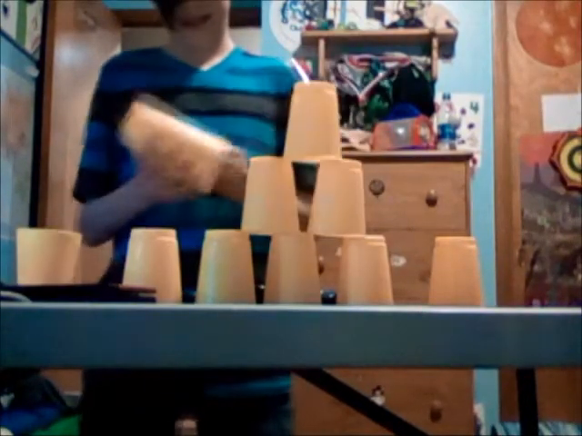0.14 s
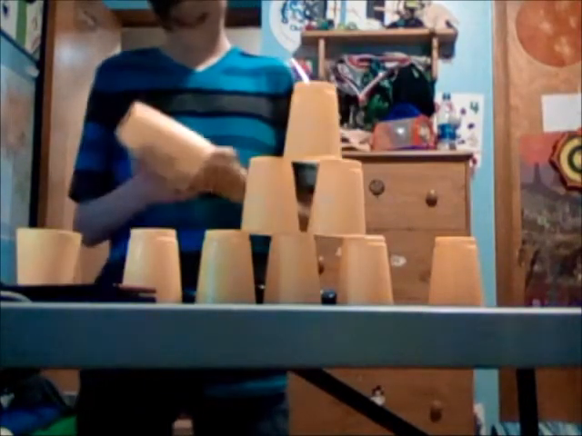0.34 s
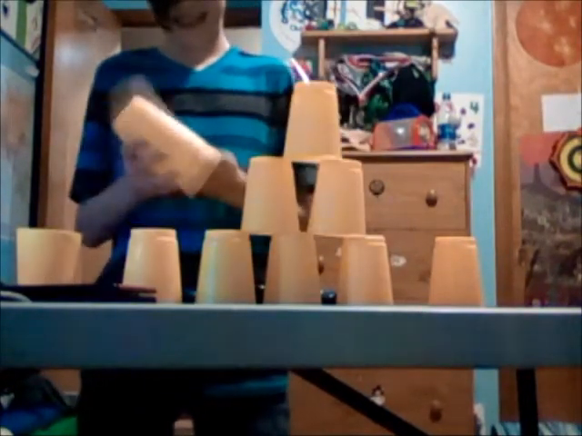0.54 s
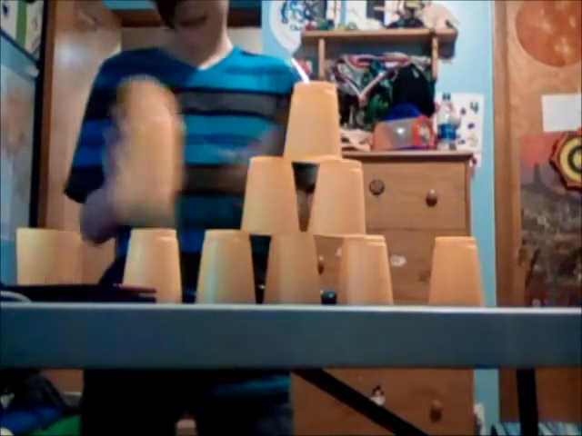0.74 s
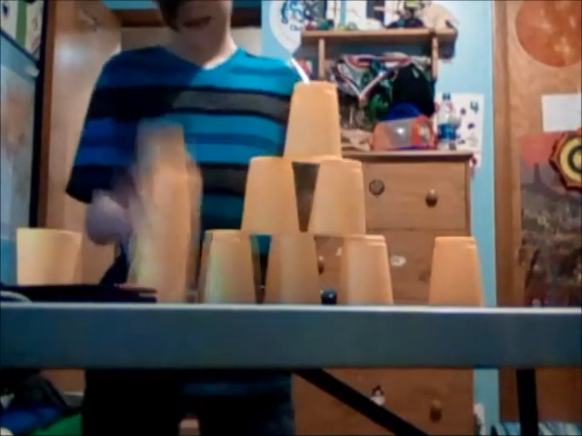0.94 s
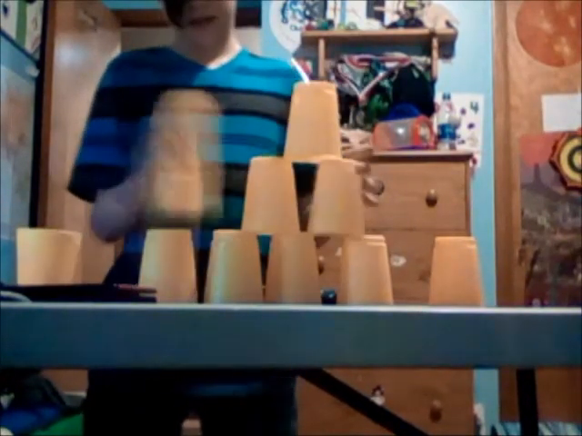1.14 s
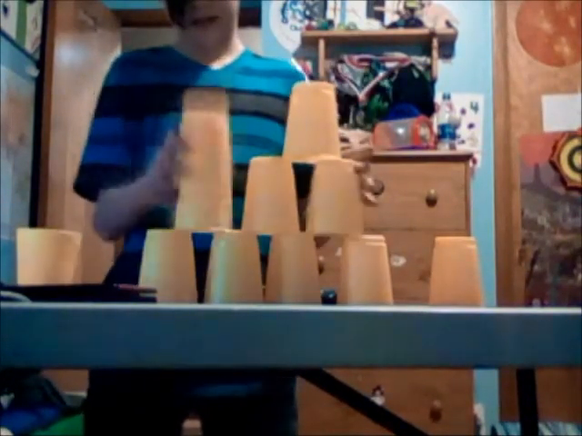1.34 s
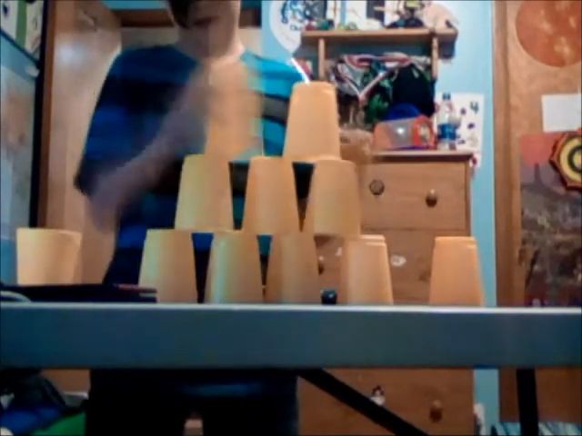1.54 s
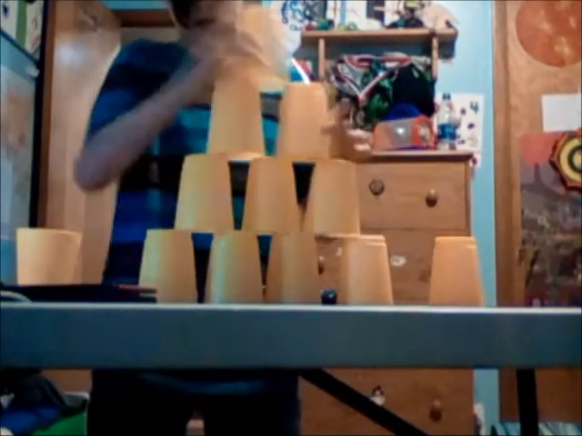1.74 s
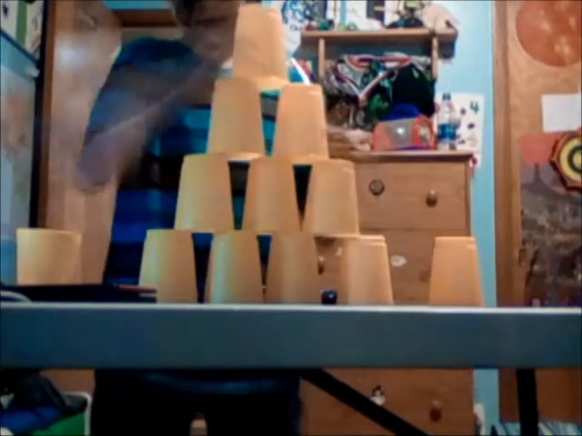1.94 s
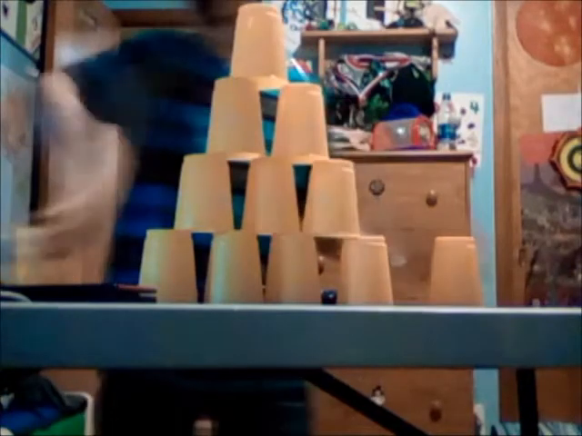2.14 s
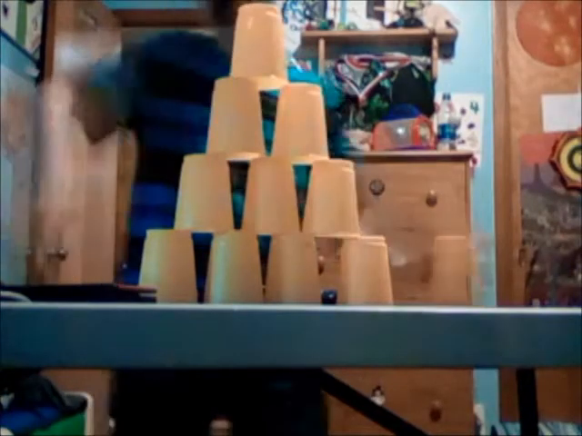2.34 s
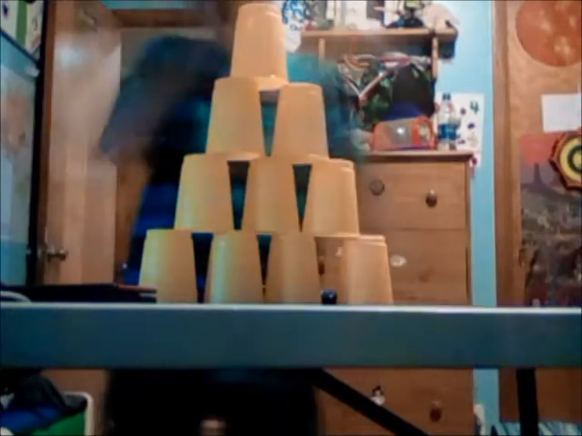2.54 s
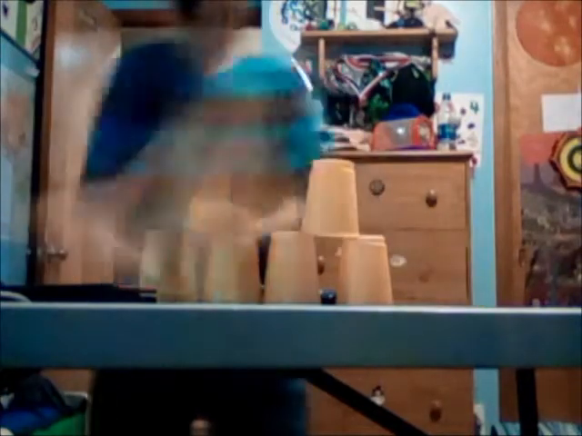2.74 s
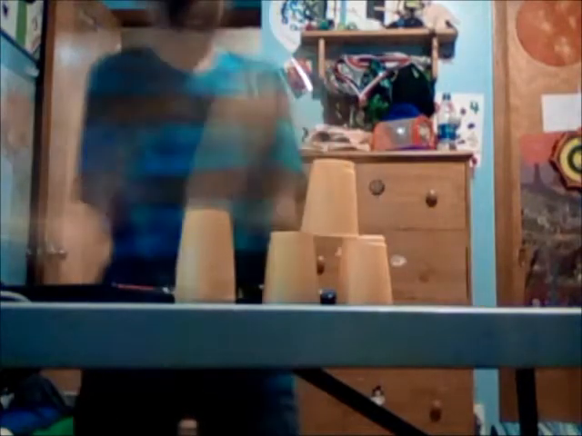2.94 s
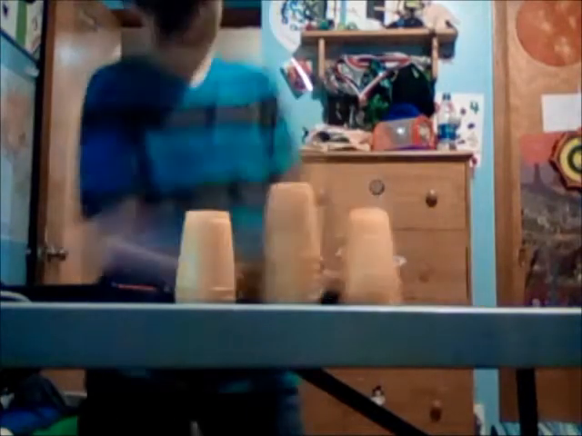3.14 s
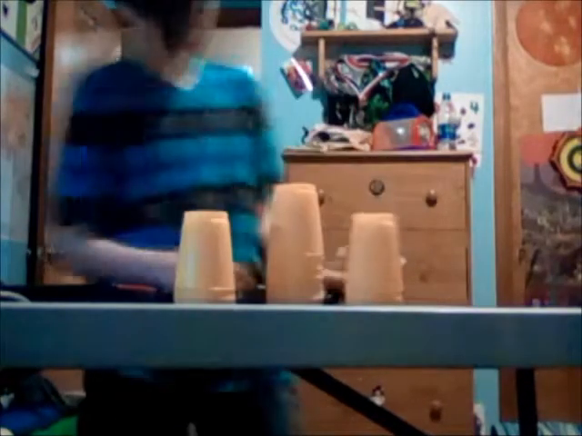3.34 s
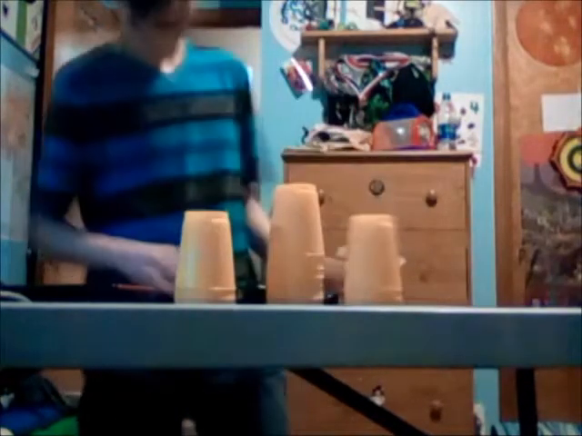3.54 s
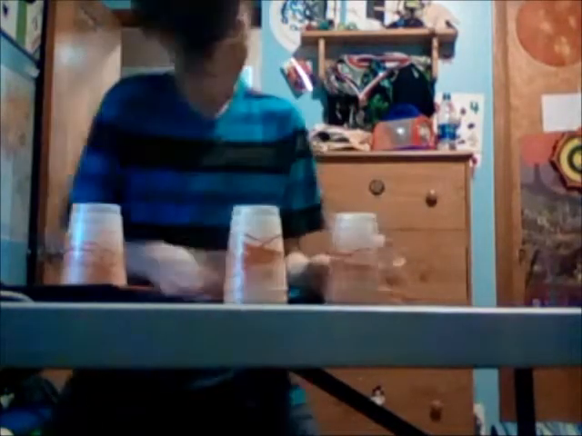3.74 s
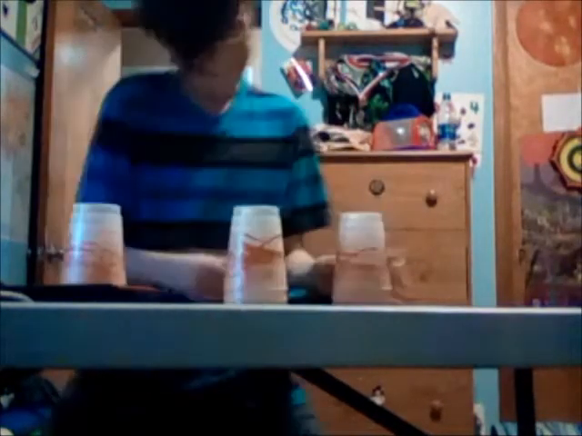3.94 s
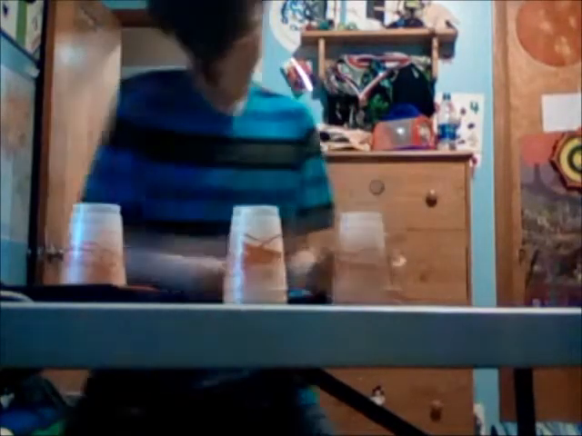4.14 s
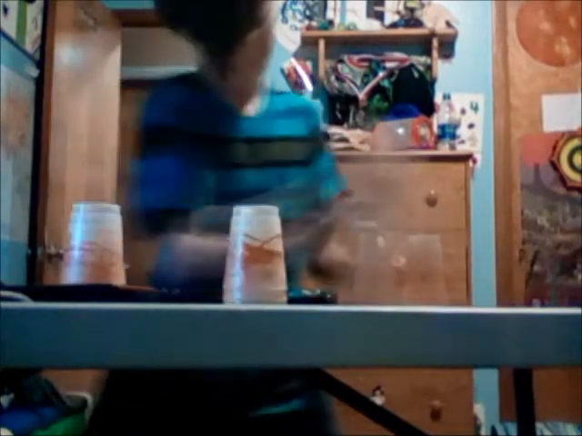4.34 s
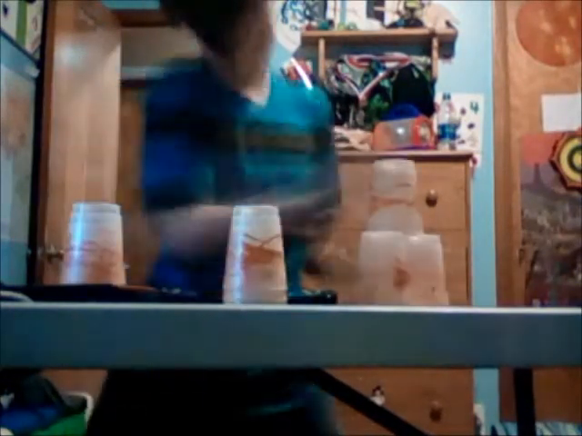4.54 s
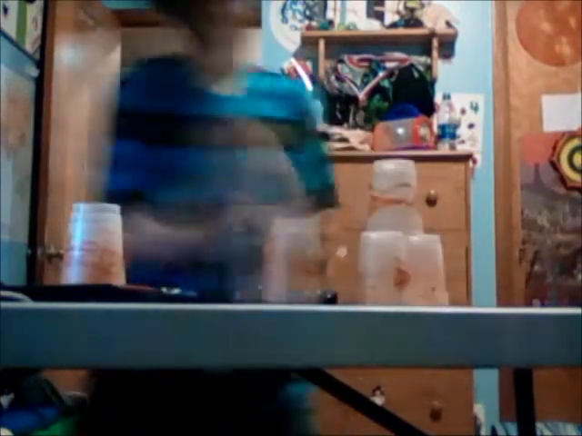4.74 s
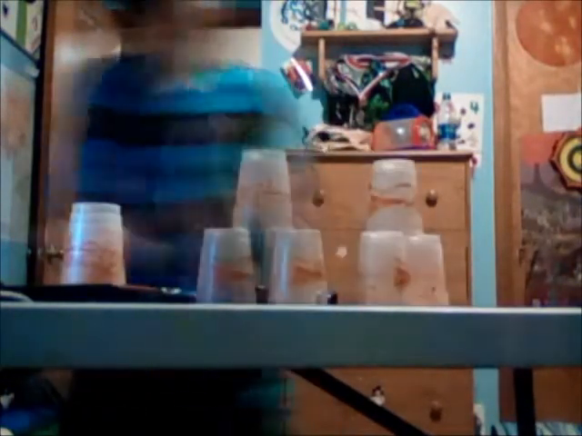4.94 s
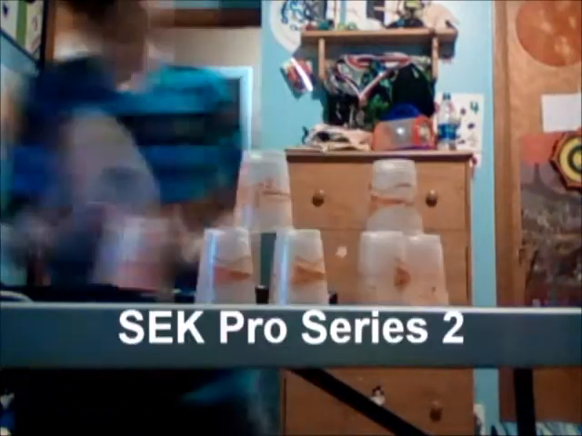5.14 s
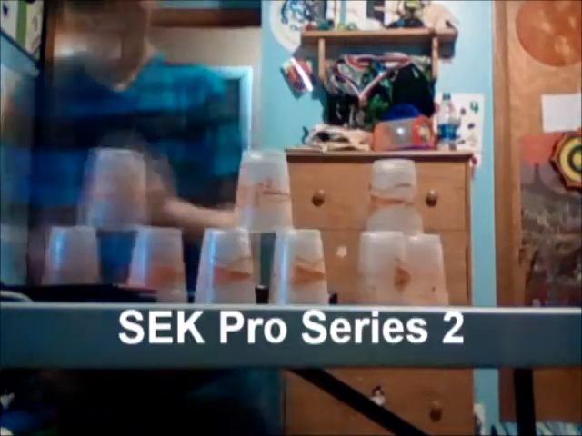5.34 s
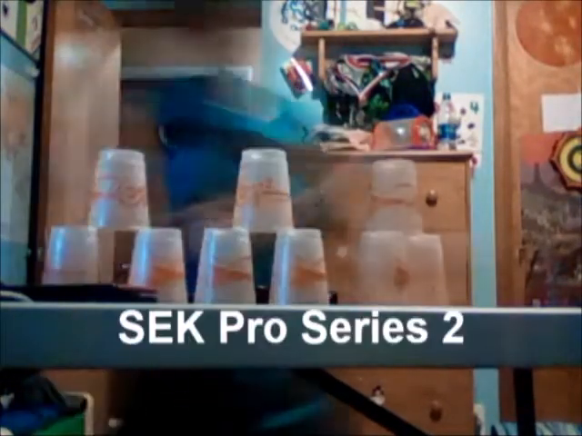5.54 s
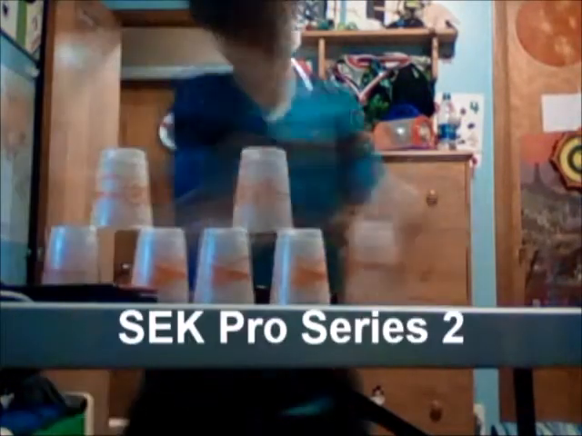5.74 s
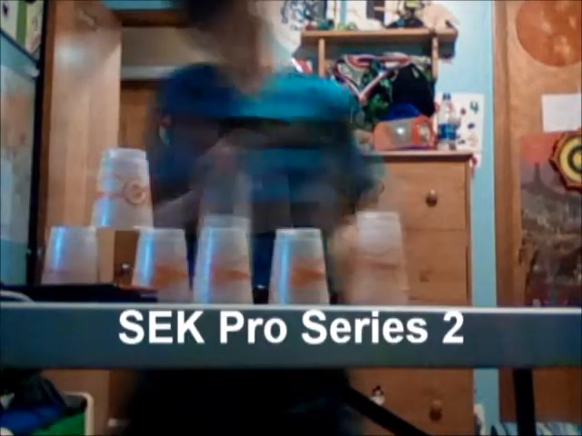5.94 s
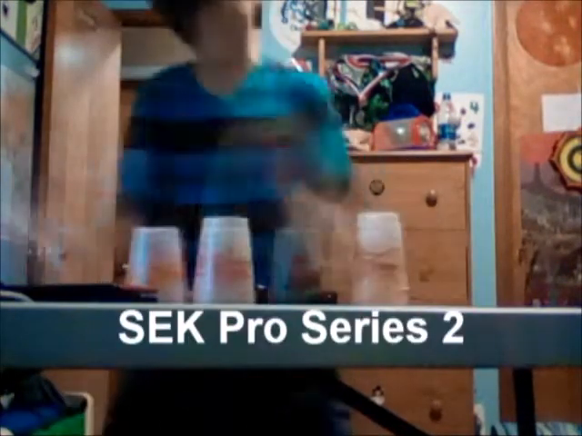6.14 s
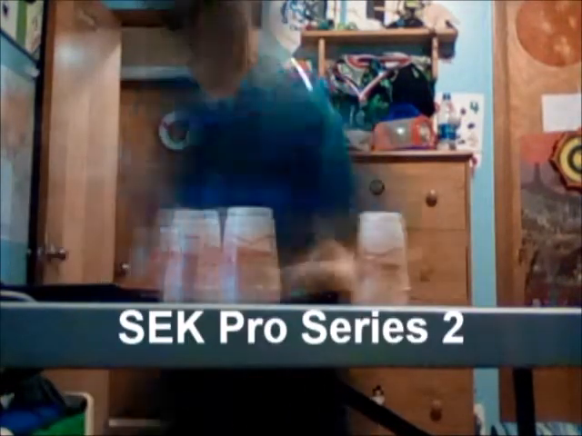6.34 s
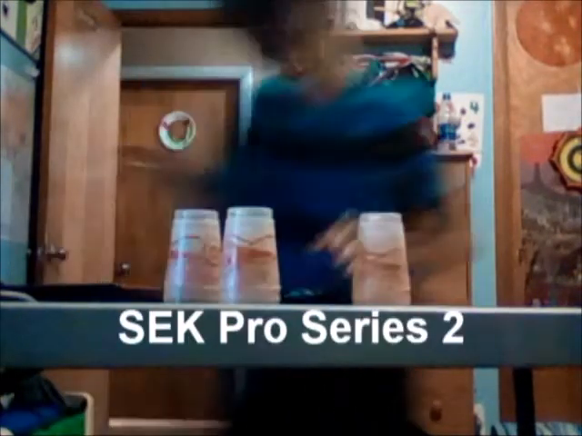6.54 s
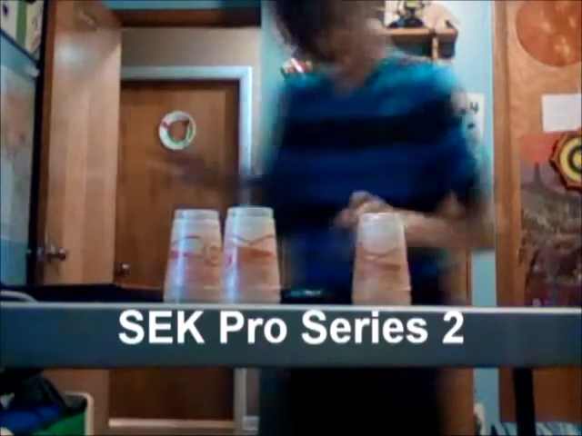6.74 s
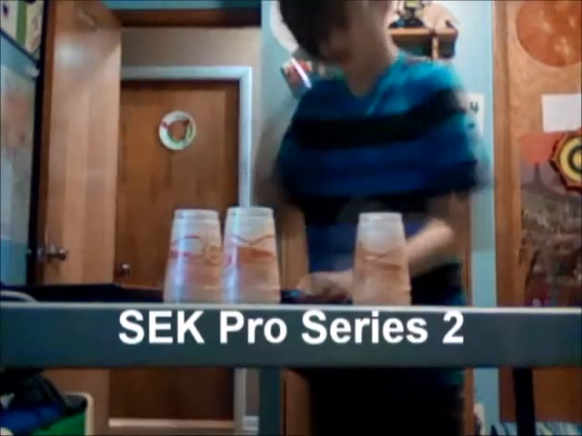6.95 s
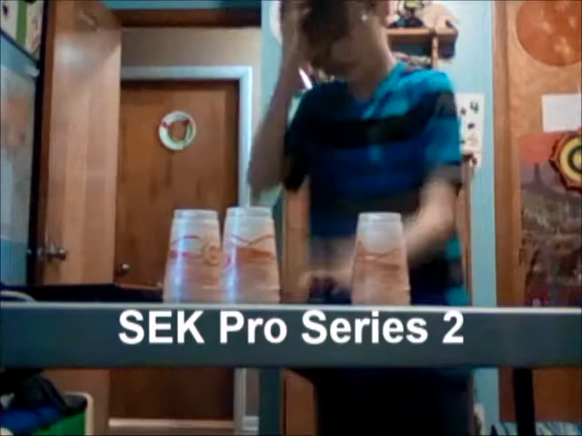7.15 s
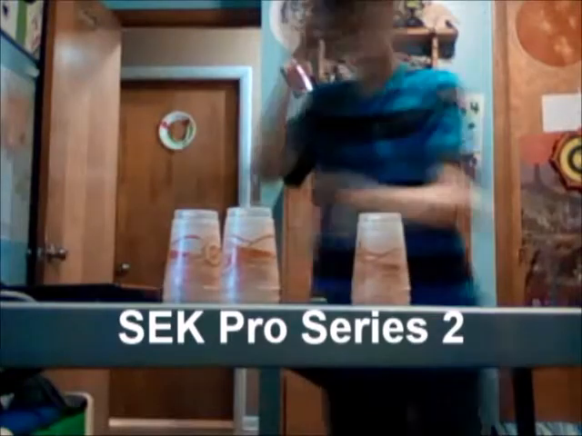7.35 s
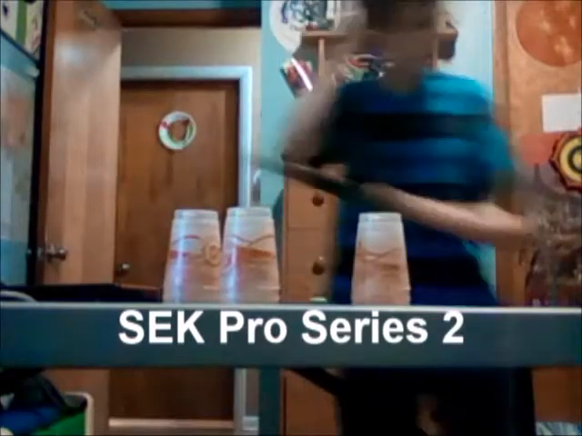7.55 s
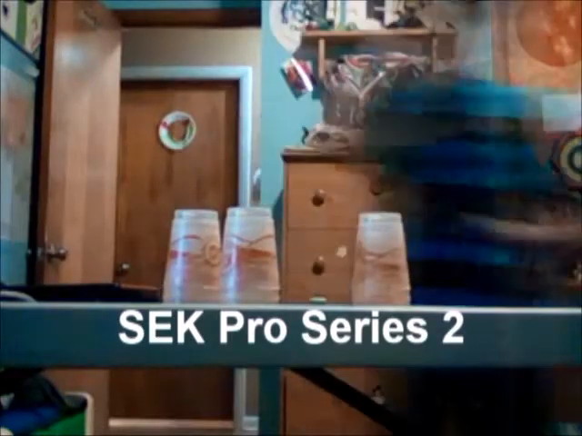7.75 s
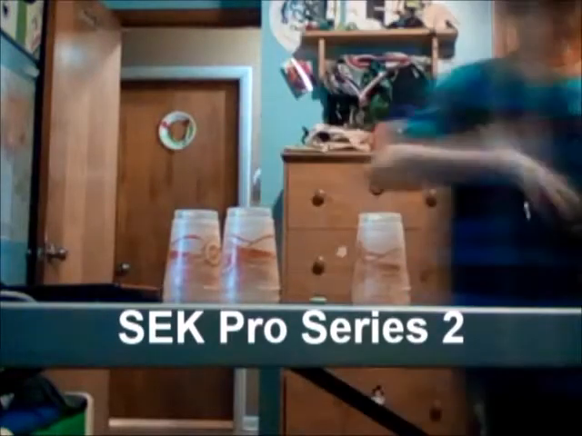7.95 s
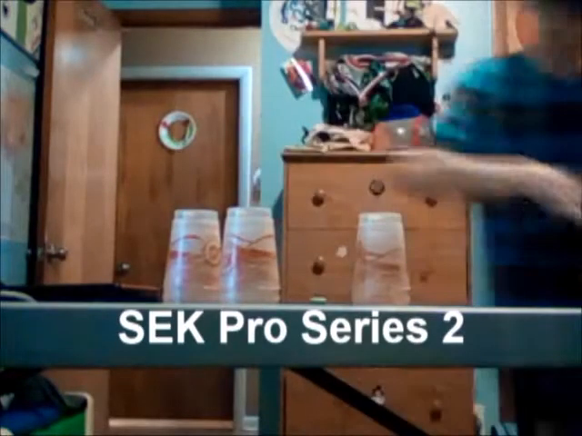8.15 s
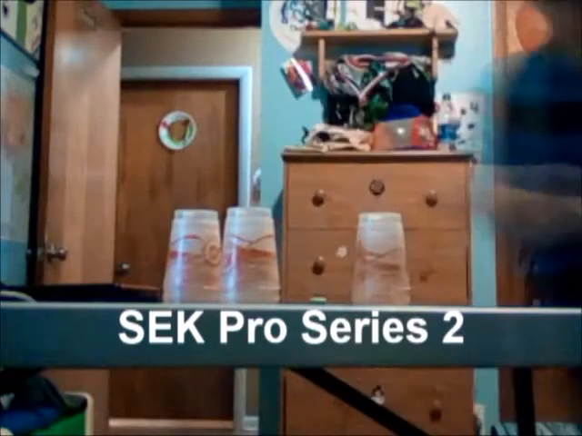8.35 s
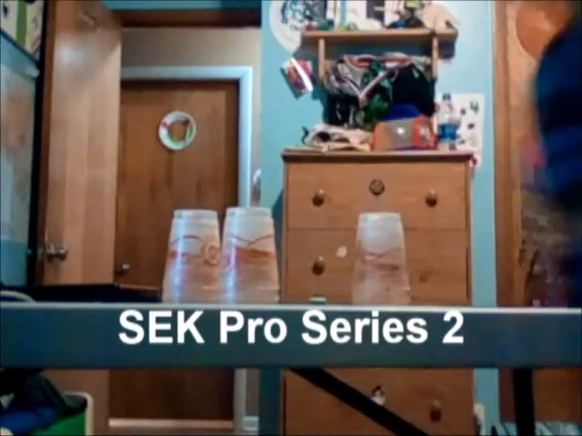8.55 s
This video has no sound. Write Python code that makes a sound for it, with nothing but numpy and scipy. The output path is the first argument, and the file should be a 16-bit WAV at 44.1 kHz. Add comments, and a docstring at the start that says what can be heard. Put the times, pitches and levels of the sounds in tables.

```python
"""Over low rumble and hiss come faint rubbing and light ticks, then louder clacks as plastic cups are stacked
and slid down at speed on a light folding table in a small bedroom.
Each contact rings modes of the table top, the air in the cups, their walls, bases and rims, and cracks at
the rim edges. Between contacts, random grit drives the same modes as rubbing and rattling.
A squeak, a thin ring, soft tones and a faint whine are sines; a small microphone overloads on the peaks."""
import sys
import numpy as np
from scipy import signal
from scipy.fft import rfft, irfft, next_fast_len
from scipy.io import wavfile
from scipy.ndimage import uniform_filter1d

SR = 44100
rng = np.random.default_rng(int(sys.argv[2]) if len(sys.argv) > 2 else 0)


def wrap_up_sound(samples):
    """Save the sound to the file named by the first command line argument, as 16-bit audio."""
    columns = np.atleast_2d(samples).T
    # keep every value between -1 and 1, then stretch to whole-number steps
    tamed = np.clip(columns, -1, 1)
    steps = np.round(tamed * 32767).astype(np.int16)
    wavfile.write(sys.argv[1], SR, steps)


N = 379701

# contacts, levels before each part's trim: start_s, crack_db, table_db, air_db, wall_db, base_db, rim_db,
# firmness (0-1)
CONTACTS = [(0.0535, -47, -66, -52, -60, -73, -52, 0.6), (0.1212, -43.5, -73, -50, -57, -81, -52, 0.5),
            (0.2164, -32.5, -50, -37.5, -26, -25, -40, 0.78),
            (0.6764, -44.5, -73, -52, -57, -68, -74, 0.36), (0.7621, -45, -69, -49, -53, -74, -61, 0.76),
            (0.825, -16.5, -16.5, -11, -9.5, -19.5, -22.5, 0.42),
            (0.924, -28, -43, -50, -61, -62, -52, 0.65), (0.9603, -42, -45.5, -47, -51, -61, -54, 0.65),
            (0.9812, -33, -32.5, -23.5, -34, -48, -41.5, 0.58),
            (1.0219, -58, -37.5, -29.5, -32, -47.5, -53, 0.79),
            (1.2177, -38.5, -62, -34.5, -43.5, -70, -68, 0.4),
            (1.295, -30.5, -31, -16, -16.5, -23, -34, 0.86), (1.3064, -31, -31, -21.5, -35, -36, -44, 0.6),
            (1.5709, -33.5, -28.5, -22, -15, -35.5, -38, 0.3),
            (1.5777, -33.5, -40.5, -19, -25.5, -29, -42.5, 1), (1.6324, -52, -51, -46, -45, -54, -65, 0.5),
            (1.696, -43, -47, -41.5, -49.5, -54.5, -54, 0.5),
            (1.7694, -32.5, -41.5, -18.5, -22.5, -26, -39.5, 0.82),
            (1.7738, -37, -37, -42.5, -19, -48.5, -51, 0.58), (1.837, -53, -46, -42, -41, -58, -67, 0.7),
            (2.1525, -48, -43.5, -62, -56, -75.5, -80.5, 0.6),
            (2.298, -49, -42.5, -69, -78, -81, -80, 0.58), (2.609, -20, -36, -25, -26.5, -49, -33.5, 0.44),
            (2.6294, -28, -35, -20.5, -22.5, -45, -45.5, 0.1),
            (2.6463, -19, -26.5, -20.5, -17.5, -28, -32, 0.32),
            (2.6874, -22, -33.5, -19.5, -25.5, -32.5, -23, 0.56),
            (2.7064, -30, -27.5, -15.5, -19.5, -37, -31.5, 0.44),
            (2.7324, -26, -27.5, -15, -23.5, -40, -25.5, 0.73),
            (2.7427, -15, -14, -15, -16, -17.5, -23, 0.44), (2.7696, -21, -18, -18, -33, -36, -34.5, 0.93),
            (2.7914, -15, -17.5, -7, -19, -16, -22, 0.48),
            (2.8124, -24, -17.5, -14.5, -33.5, -33, -29.5, 0.89),
            (3.062, -15, -29.5, -20, -11, -25.5, -27, 0.73),
            (3.1033, -15, -17.5, -7.5, -6, -5.5, -18.5, 0.64),
            (3.1214, -19, -17, -22.5, -36, -35.5, -28, 0.4),
            (3.1406, -18.5, -26.5, -25.5, -33, -30.5, -29.5, 0.4),
            (3.1627, -23, -6, -7, -34, -28, -23, 0.4), (3.1964, -26.5, -34, -26, -44, -25, -26, 0.27),
            (3.367, -41.5, -50, -50, -64, -54, -46.5, 0.43), (3.5902, -73, -45.5, -72, -79, -79, -81, 0.54),
            (3.6885, -74, -39, -55.5, -80, -83, -84, 0.47),
            (3.7486, -30, -23.5, -27.5, -38, -39, -33.5, 0.6),
            (4.2445, -53, -37, -45.5, -57, -41.5, -57, 0.6), (4.2974, -51, -29.5, -58, -66, -65, -72, 0.25),
            (4.3894, -58, -33.5, -39, -62, -64, -66, 0.5), (4.4249, -41, -26, -11.5, -32, -28.5, -32, 0.38),
            (4.4348, -28.5, -21, -16.5, -53, -49, -32.5, 0.6),
            (4.5082, -12.5, -19, -8.5, -12.5, -13.5, -24, 0.5),
            (4.7005, -21.5, -15.5, -15, -35, -31, -24.5, 0.55),
            (4.8685, -64, -29, -45, -63.5, -63, -69, 0.4), (4.9008, -26, -18, -15, -23, -38, -30.5, 0.66),
            (4.9369, -14, -20, -12, -10.5, -14, -28.5, 0.46), (4.9597, -20, -23, -7.5, -36, -30, -27, 0.45),
            (5.0912, -27, -25.5, -31, -53, -38, -42, 0.55), (5.2467, -19.5, -51, -58, -54, -33, -49, 0.4),
            (5.2602, -18, -32.5, -38, -38, -52, -24.5, 0.7),
            (5.2968, -24.5, -19.5, -4.5, -14, -24.5, -28, 0.67),
            (5.3244, -13.5, -9, -5.5, -17, -13.5, -21.5, 0.57),
            (5.5402, -48, -18.5, -49.5, -48.5, -58, -48, 0.54),
            (5.557, -34.5, -13.5, -40.5, -41.5, -39, -39.5, 0.24),
            (5.5953, -28, -20.5, -15.5, -32, -28.5, -25.5, 0.37),
            (5.611, -16, -16, -17, -27.5, -30, -25.5, 0.6),
            (5.634, -14.5, -20.5, -19, -22.5, -20, -21.5, 0.55),
            (5.6708, 1, -20.5, -8.5, -17, -11.5, -9, 0.82), (5.6898, -8, -16, -5, -14.5, -23, -22.5, 0.46),
            (5.7454, -21, -13, -6.5, -20, -13.5, -22, 0.54),
            (5.7633, -20, -18.5, -14, -33.5, -22.5, -30, 0.83),
            (5.7924, -19, -20, -20, -29.5, -27, -21.5, 0.54),
            (5.8544, -28.5, -18, -9, -22.5, -35, -34.5, 0.88),
            (5.8667, -16, -17.5, -17.5, -27, -27.5, -22.5, 0.48),
            (5.9174, -23.5, -28.5, -32.5, -33, -29, -29.5, 0.65),
            (6.0018, -29.5, -32, -25, -51, -64, -39, 0.19),
            (6.0337, -20.5, -25, -15, -26.5, -30.5, -23.5, 0.8),
            (6.1035, -21, -24.5, -14, -25.5, -24.5, -28.5, 0.25),
            (6.1245, -9, -27.5, -19, -17.5, -14.5, -10, 0),
            (6.1463, -0.5, -21, -17.5, -13.5, -15, -12, 0.83), (6.234, -2, -15, 2, -21.5, -5, -17, 0.68),
            (6.2574, -7.5, -15.5, -6.5, -13.5, -15.5, -16.5, 0.44),
            (6.3016, -1, -6, -10.5, -19, -15.5, -9, 0.72),
            (6.3174, -20.5, -20, -6.5, -29, -21, -21.5, 0.75),
            (6.9802, -38.5, -40, -34, -45, -55, -37, 0.4), (7.0034, -51, -23.5, -38, -50, -36, -42, 0.17),
            (7.0482, -46, -49, -44, -58, -45, -48, 0.6), (7.1313, -47, -48, -49, -56, -62, -49, 0.56),
            (7.1464, -48, -68, -56, -56, -50, -47, 0.5), (7.1664, -56, -65, -43, -52, -35.5, -41.5, 0.5),
            (7.1972, -62, -72, -60, -61, -42, -44.5, 0.75), (7.237, -54, -54, -47, -49, -35.5, -43, 0.54),
            (7.6084, -65, -67, -54, -60, -52, -73, 0.52), (7.678, -71, -56, -49, -71, -72, -75, 0.65),
            (7.8604, -73, -71, -47.5, -60, -68, -73, 0.53),
            (7.9723, -54, -73, -52.5, -64, -42.5, -44.5, 0.46)]


def from_db(db):
    """Amplitude gain from dB."""
    return 10 ** (np.asarray(db) / 20)


def rms_one(x):
    """Scale to rms 1."""
    return x / np.sqrt(np.mean(x ** 2) + 1e-20)


def smooth_noise(size, shape=N):
    """Slow random wander: noise averaged over size samples, rms 1."""
    return rms_one(uniform_filter1d(rng.standard_normal(shape), size=size))


def in_time(rows):
    """Each column after the first, interpolated linearly over time."""
    s, *columns = np.transpose(rows)
    return [np.interp(np.arange(N) / SR, s, c) for c in columns]


def floor():
    """House rumble and microphone hiss: spectrally shaped noise of slightly uneven level."""
    # noise spectrum: freq_hz, relative_db
    spectrum = [(18, -67), (30, -32), (108, 1), (299, -14.5), (332, -6), (389, -20.5), (1290, -31.5),
                (1640, -28.5), (2130, -33.5), (2300, -22), (3150, -26.5), (3490, -26.5), (6540, -27.5),
                (7860, -41), (11500, -46.5), (15500, -54.5)]
    level_db, flicker_db = -63.5, -2.5
    size = next_fast_len(N)
    hz = np.maximum(np.arange(size // 2 + 1) * SR / size, 1)
    point_hz, point_db = np.transpose(spectrum)
    shape = from_db(np.interp(np.log(hz), np.log(point_hz), point_db))
    noise = rms_one(irfft(rfft(rng.standard_normal(size)) * shape, size)[:N])
    flicker = rms_one(uniform_filter1d(smooth_noise(3000), size=3000))
    return from_db(level_db + flicker_db * flicker) * noise


def whine():
    """Faint steady electronic whine: constant sines."""
    # whine partials: freq_hz, rms_db
    partials = [(11197, -93)]
    t = np.arange(N) / SR
    return sum(np.sqrt(2) * from_db(db) * np.sin(2 * np.pi * hz * t) for hz, db in partials)


def strokes(rows, lean):
    """Power of each level column over time: a quick swell, then a slower fade."""
    power, t = 0, np.arange(N) / SR
    for start, length, *db in rows:
        swell = np.sin(np.pi * np.clip((t - start) / length, 0, 1) ** lean)
        power = power + np.outer(from_db(db), swell) ** 2
    return power


def rubbing():
    """Rubbing levels in dB for table, air, wall and rim hiss: busy hands, jerky slides and brushes."""
    # hands moving among the cups: time_s, air_db
    hands = [(0.0, -64), (1.58, -64.5), (1.77, -50), (1.97, -63.5), (2.61, -66.5), (2.76, -44.5),
             (3.74, -72.5), (4.56, -47.5), (5.63, -49), (5.78, -42), (5.97, -54.5), (6.28, -35),
             (6.55, -70.5), (8.61, -72)]
    # cups sliding over each other or the table: start_s, length_s, table_db, air_db, wall_db, hiss_db
    slides = [(.86, 0.25, -55.5, -36.5, -62.5, -50), (1.7, 0.33, -53, -42, -47.5, -63),
              (2.61, 0.34, -46, -39.5, -31.5, -29), (3.2, 0.18, -25, -34, -43, -39.5),
              (3.76, .17, -46, -54, -57, -51), (4.38, 0.098, -54.5, -63, -71, -72),
              (4.7, 0.12, -34, -58.5, -67, -44), (5.0, 0.37, -37, -45, -54, -53),
              (5.55, 0.51, -18.5, -31, -37.5, -32), (5.7, 0.34, -35, -31, -34, -31.5),
              (6.02, 0.6, -26.5, -39, -45, -37.5), (6.24, 0.22, -48, -30.5, -30.5, -25.5),
              (6.97, 0.27, -48, -49, -62, -60), (7.59, 0.21, -57, -49, -68, -78)]
    # hand or sleeve over plastic: start_s, length_s, hiss_db
    brushes = [(0.167, 0.06, -44.5), (0.432, 0.064, -44), (0.897, .14, -46.5), (2.156, 0.23, -58.5),
               (4.134, 0.11, -52), (4.286, 0.12, -71), (5.211, 0.24, -38.5), (6.969, 0.12, -63),
               (7.129, 0.22, -66), (7.59, 0.11, -67), (8.452, 0.33, -61)]
    parts_db = [-5, 0, -10, -9]  # hand rubbing on each part, against the air
    catch_db = 3
    power = np.outer(from_db(parts_db), from_db(in_time(hands)[0])) ** 2
    # sliding cups catch and let go, in each part on its own
    catch = from_db(catch_db * rms_one(smooth_noise(400, (4, N))))
    power += strokes(slides, lean=0.47) * rms_one(catch) ** 2
    power[3] += strokes(brushes, lean=0.82)[0]
    return 10 * np.log10(power)


def grit(per_s, spread_db):
    """Random clicks of uneven size and sign, rms 1."""
    sizes = from_db(spread_db * np.minimum(rng.exponential(1, N), 4)) * rng.choice([-1, 1], N)
    return rms_one(sizes * (rng.random(N) < per_s / SR))


def contacts(level_db, chatter, rebounds):
    """A firm blow is one click with small rebounds dying after it; a soft one swells out of rebounds alone."""
    start_s, firmness = np.array(CONTACTS)[:, [0, 7]].T
    push = np.zeros(N)
    tau = 0.013 * SR  # rebound decay, samples
    after = np.arange(1, int(6 * tau))
    for at, gain, firm in zip(np.round(start_s * SR).astype(int), from_db(level_db), firmness):
        swell = (1 - (1 - firm) * np.exp(-2 * after / tau)) * np.exp(-after / tau)
        swell_rms = np.sqrt(np.mean(swell ** 2))
        push[at] += firm ** 2 * gain
        push[at + after] += gain * chatter * rms_one(swell * rebounds[at + after]) * swell_rms
    return push


def ring(push, hz, t60_s):
    """Two-pole resonator: a unit click starts a decaying sine of height 1."""
    r, w = from_db(-60 / (t60_s * SR)), 2 * np.pi * hz / SR
    return signal.lfilter([0, np.sin(w)], [1, -2 * r * np.cos(w), r * r], push + 1e-18)


def body(modes, blow_db, rub_db, chatter, per_s, soft_hz):
    """Blows and grit drive the same modes, each blow in its own mix; the yielding contact dulls the result."""
    click = np.eye(1, 4096)[0]
    unit = sum(from_db(db) * ring(click, hz, t60_s) for hz, db, t60_s in modes)
    blows = contacts(blow_db, chatter, grit(per_s, 3.5)) / np.abs(unit).max()
    rub = from_db(rub_db) * grit(per_s, 1.6) / np.sqrt(np.sum(unit ** 2))
    start = np.round(np.array(CONTACTS)[:, 0] * SR)
    latest = np.searchsorted(start, np.arange(N), side="right")  # the blow now sounding
    mixes = from_db(2.2 * rng.standard_normal((len(CONTACTS) + 1, len(modes))))
    out = 0
    for k, (hz, db, t60_s) in enumerate(modes):
        out = out + from_db(db) * ring(blows * mixes[latest, k] + rub, hz, t60_s)
    band_hz = [0.56 * modes[0][0], soft_hz]  # small bodies radiate little below their lowest mode
    return signal.sosfilt(signal.butter(2, band_hz, "band", fs=SR, output="sos"), out)


def table_top(blow_db, rub_db):
    """Low modes of the table top."""
    # modes: freq_hz, relative_db, t60_s
    modes = [(78, -17.5, 0.033), (120.7, 0.5, 0.12), (151.9, -5.5, 0.32), (208, 6.5, 0.065),
             (284, 2, 0.083), (335, -5.5, 0.3)]
    return body(modes, blow_db + 6, rub_db - 3, chatter=0.067, per_s=1600, soft_hz=700)


def cup_air(blow_db, rub_db):
    """Resonances of the air in the cups."""
    # modes: freq_hz, relative_db, t60_s
    modes = [(436.8, 4, 0.05), (530.8, 13, 0.044), (525.8, -0.5, 0.13), (601.6, 6, 0.057),
             (711.6, -11, 0.045)]
    return body(modes, blow_db + 9, rub_db - 3, chatter=0.046, per_s=1600, soft_hz=1370)


def cup_wall(blow_db, rub_db):
    """Modes of the cup walls."""
    # modes: freq_hz, relative_db, t60_s
    modes = [(950, -4.5, 0.026), (837, -3.5, 0.13), (950, -0.5, 0.048), (1007, -8.5, 0.044),
             (1160, -8.5, 0.0045)]
    return body(modes, blow_db + 5, rub_db - 5, chatter=0.092, per_s=1500, soft_hz=1860)


def cup_base(blow_db, rub_db):
    """Modes of the cup bases."""
    # modes: freq_hz, relative_db, t60_s
    modes = [(1252, 7, 0.02), (1298.5, 2, 0.067), (1359.5, 6, 0.033), (1451, -7, 0.21), (1695, -9, 0.015)]
    return body(modes, blow_db + 2.5, rub_db - 9, chatter=0.11, per_s=1900, soft_hz=2570)


def cup_rim(blow_db, rub_db):
    """Short high modes of the rims."""
    # modes: freq_hz, relative_db, t60_s
    modes = [(2140, -4, 0.0022), (2378, 0.5, 0.013), (2981, 0, 0.004), (3180, 9.5, 0.0023),
             (3330, 1, 0.0014), (3930, 4, 0.0052)]
    return body(modes, blow_db + 5.5, rub_db - 7, chatter=0.26, per_s=6300, soft_hz=5800)


def rim_edge(blow_db, rub_db):
    """Ringing part of the rim-edge crack."""
    # modes: freq_hz, relative_db, t60_s
    modes = [(5020, 1, 0.0046), (5320, -9, .012), (5805, 6.5, 0.0041), (6433, 3.5, 0.008),
             (7083, -6, 0.013)]
    return body(modes, blow_db - .1, rub_db - 5, chatter=0.24, per_s=7700, soft_hz=8680)


def ticks(crack_db, hiss_db):
    """Unringing top: clicks and noise in a high band, their level following the crack and the hiss."""
    band_hz, level_db = [7000, 11500], -22
    push = contacts(0.97 * crack_db, 0.59, grit(4200, 4.9))
    push += from_db(hiss_db) * rng.standard_normal(N)
    return from_db(level_db) * signal.sosfilt(signal.butter(2, band_hz, "band", fs=SR, output="sos"), push)


def squeak():
    """A rim slips as a cup leaves the stack: a short rising tone broken up by uneven grip."""
    # squeak path: time_s, pitch_hz, level_db
    path = [(0.875, 5250, -39), (.882, 5470, -25), (.89, 7200, -28), (.9, 7540, -30), (0.912, 7800, -43)]
    before = [(0, 5200, -150), (path[0][0] - .003, 5200, -150)]
    after = [(path[-1][0] + .01, 8000, -150)]
    pitch_hz, level_db = in_time(before + list(path) + after)
    grip, slip = smooth_noise(90), smooth_noise(40)
    phase = 2 * np.pi * np.cumsum(pitch_hz * (1 + .05 * slip)) / SR
    return from_db(level_db) * (.35 + .55 * grip) * np.sin(phase)


def ping():
    """Thin high ring left by one knock: a wavering, slightly sinking, decaying sine."""
    start_s, pitch_hz, level_db, t60_s, sag_hz_per_s = 3.75, 3660, -58, .7, 150
    t = np.maximum(np.arange(N) / SR - start_s, 0)
    waver = 1 + .45 * smooth_noise(500)
    tone = np.sin(2 * np.pi * (pitch_hz - sag_hz_per_s * t / 2) * t)
    return from_db(level_db - 60 * t / t60_s) * waver * tone


def soft_tones():
    """Faint sines in the pauses, each swelling and fading softly."""
    # tones: start_s, end_s, pitch_hz, level_db (rms at the top of the swell)
    tone_rows = [(3.986, 4.197, 496, -56.5), (8.103, 8.302, 332.4, -73), (8.386, 8.622, 257.5, -62)]
    t, out = np.arange(N) / SR, np.zeros(N)
    for start, end, hz, db in tone_rows:
        swell = np.sin(np.pi * np.clip((t - start) / (end - start), 0, 1) ** 0.98) ** .5
        out += np.sqrt(2) * from_db(db) * swell * np.sin(2 * np.pi * hz * t)
    return out


def bedroom(x):
    """Twelve feedback delays, duller on every round, then scattered by the clutter through allpasses."""
    t60_s, wall_cut_hz = 0.21, 22000
    size = next_fast_len(N + SR // 2)
    w = 2 * np.pi * np.arange(size // 2 + 1) / size
    dull = np.exp(-2 * np.pi * wall_cut_hz / SR)
    wall = (1 - dull) / (1 - dull * np.exp(-1j * w))
    echoes = 0
    for k, lag in enumerate((np.geomspace(.0131, .053, num=12) * SR).astype(int)):
        round_trip = from_db(-60 * lag / SR / t60_s) * wall * np.exp(-1j * w * lag)
        echoes = echoes + (-1) ** k * round_trip / (1 - round_trip)
    for lag in (47, 131, 223):
        late = np.exp(-1j * w * lag)
        echoes = echoes * (late - .6) / (1 - .6 * late)
    return irfft(rfft(x, size) * echoes, size)[:N]


def scene():
    """Cups and table, their room echo, and the faint steady and tonal layers."""
    _, crack_db, table_db, air_db, wall_db, base_db, rim_db, _ = np.transpose(CONTACTS)
    table_rub_db, air_rub_db, wall_rub_db, hiss_db = rubbing()
    cups = table_top(table_db, table_rub_db)
    cups += cup_air(air_db, air_rub_db)
    cups += cup_wall(wall_db, wall_rub_db)
    cups += cup_base(base_db, wall_rub_db)
    cups += cup_rim(rim_db, hiss_db)
    cups += rim_edge(crack_db, hiss_db)
    cups += ticks(crack_db + 1.0, hiss_db)
    cups += squeak()
    # a light table radiates little deep bass
    cups = signal.sosfilt(signal.butter(2, 75.6, "high", fs=SR, output="sos"), cups)
    room_db = -16
    room = from_db(room_db) * bedroom(cups)
    return (cups + room + floor() + whine() + ping() + soft_tones())[None]


def record(dry):
    """The small capsule loses the deep bass, the hardest peaks overload, the top is cut."""
    low_hz, overload, cutoff_hz = 30.67, .98, 15750
    thin = signal.sosfilt(signal.butter(2, low_hz, "high", fs=SR, output="sos"), dry)
    clipped = thin / (1 + np.abs(thin / overload) ** 6) ** (1 / 6)
    return signal.sosfilt(signal.ellip(12, .5, 50, cutoff_hz, fs=SR, output="sos"), clipped)


dry = scene()
out = record(dry)
wrap_up_sound(out)
```